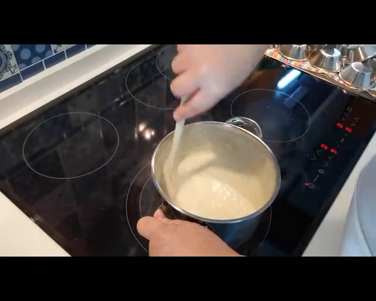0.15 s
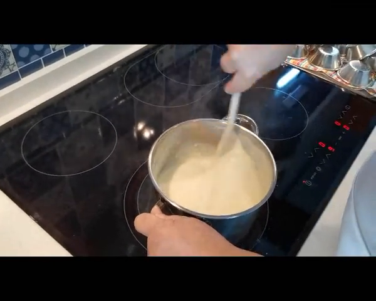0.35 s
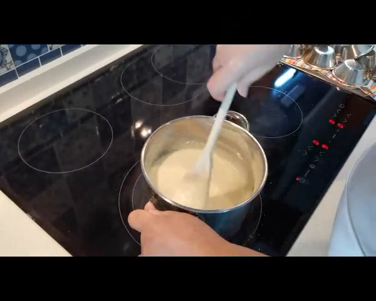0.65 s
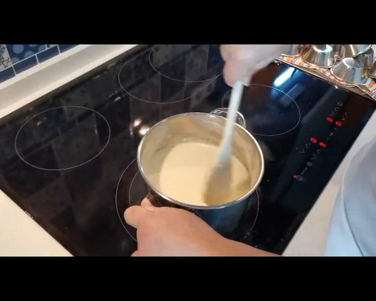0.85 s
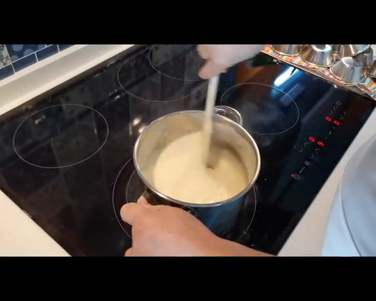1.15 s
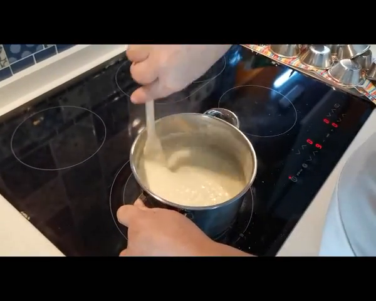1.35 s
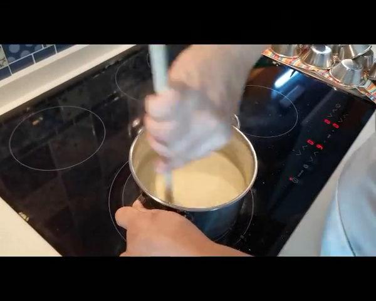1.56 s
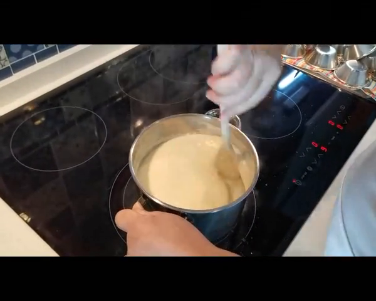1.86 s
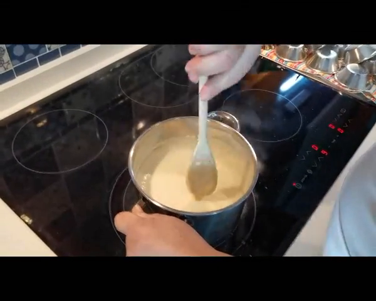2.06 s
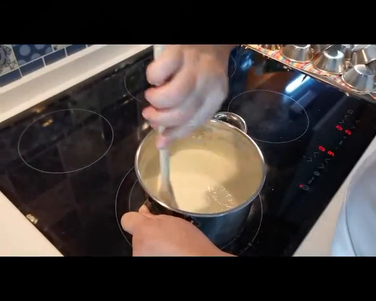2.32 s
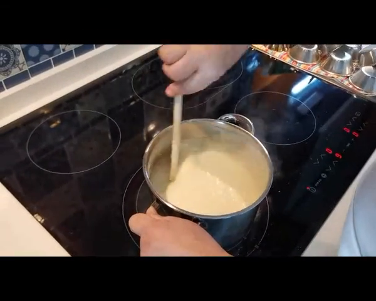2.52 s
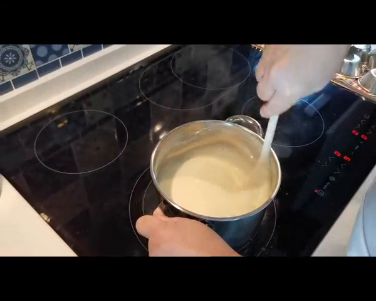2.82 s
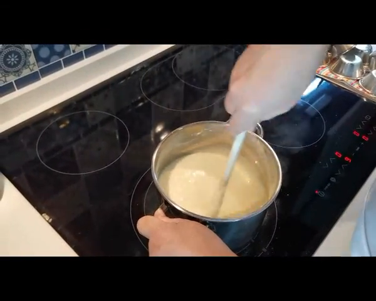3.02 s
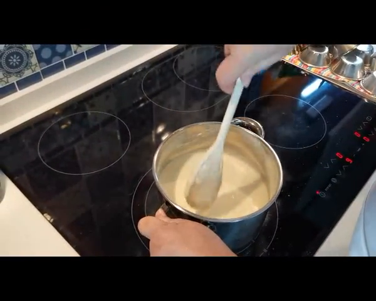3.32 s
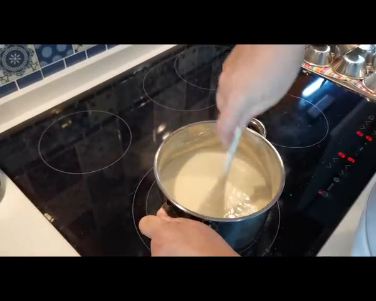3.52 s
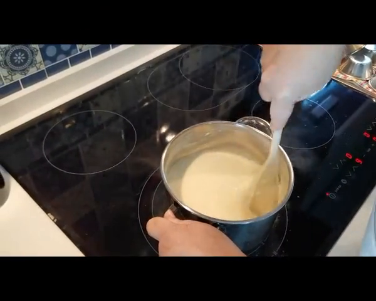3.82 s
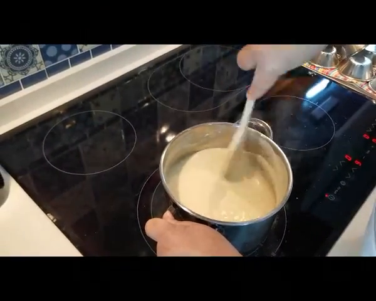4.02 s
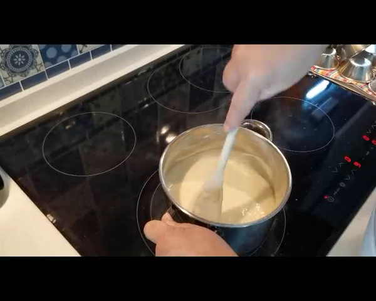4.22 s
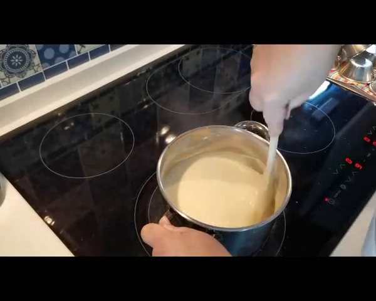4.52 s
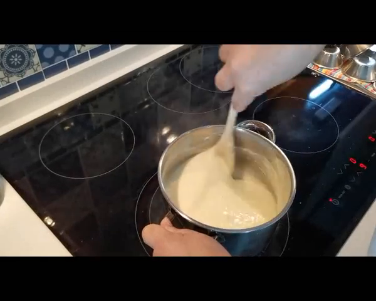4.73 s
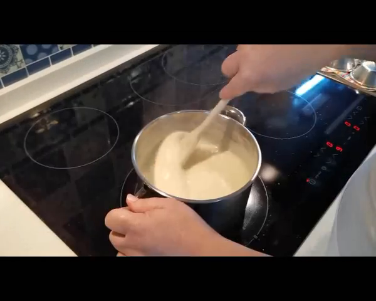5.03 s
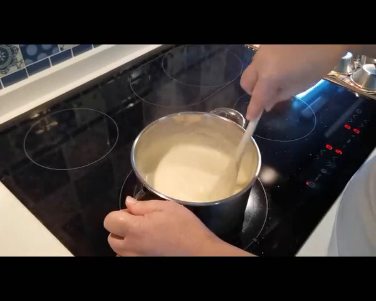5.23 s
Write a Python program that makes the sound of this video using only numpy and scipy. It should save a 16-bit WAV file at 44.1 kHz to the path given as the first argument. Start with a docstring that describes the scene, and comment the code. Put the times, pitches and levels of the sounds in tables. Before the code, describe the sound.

A wooden spoon scrapes and knocks around a steel saucepan, stirring a thick, softly churning filling in a quiet kitchen.

```python
"""Gritty scrapes and dull knocks: a wooden spoon stirs thick filling in a steel saucepan on a glass hob.
Stroke by stroke the wood slips over the steel, rasping, hissing and briefly squealing. Its knocks ring
the wall, damped by the filling, and the rocking pan thuds in the hob. The filling churns in soft waves
and ticks now and then over a small kitchen's hush. Near the end the sound cuts out for an instant."""
import sys
import numpy as np
from scipy import signal
from scipy.fft import rfft, irfft, next_fast_len
from scipy.io import wavfile
from scipy.ndimage import map_coordinates

SR = 44100
rng = np.random.default_rng(int(sys.argv[2]) if len(sys.argv) > 2 else 0)


def log_audio(samples):
    """Write samples as a 16-bit WAV file to the path given in sys.argv[1]."""
    # one column per channel
    frames = np.atleast_2d(samples).T
    # limit to full scale, then quantise
    limited = np.clip(frames, -1, 1)
    pcm = np.round(limited * 32767).astype(np.int16)
    wavfile.write(sys.argv[1], SR, pcm)


N = 237037

# spoon hits on the pan: (time [s], ring [dB], clack [dB], contact cut-off [Hz], treble lean left less 2 dB
# [dB], wall pitch [factor], ring length [factor], clack tilt [dB/octave]); the treble leans left by that value
# plus 2 dB
KNOCKS = [(0.0703, -37.5, -31, 2840, -4.5, 0.95, 0.5, 0), (0.332, -42, -30, 2840, -5.5, 0.86, 0.47, 2.5),
          (0.4158, -63, -41.5, 2290, -4.5, 1, 0.52, 2.5), (1.0069, -27, -33, 3000, -5, 1.0, 0.55, -1),
          (1.336, -77, -51, 1880, 1, 1.3, 0.66, -2.5), (2.2409, -43, -39.5, 1310, -1.5, 0.8, 0.33, 2),
          (2.627, -78, -41, 3720, 5, 1.03, 0.5, -0.1), (3.5641, -47.5, -41, 1060, 6, .92, 0.19, -6.5),
          (4.3115, -32, -30, 2540, 2, 0.92, 0.19, -2), (5.119, -59, -38.5, 3030, 2.5, 1.23, 0.32, -0.5),
          (5.2054, -75, -46, 2300, 2, 1.3, 0.41, -3)]
# modes of the glass hob: (frequency [Hz], level [dB], t60 [s])
HOB = [(65.8, 7, 0.31), (116.8, 3, 0.26), (183.7, -10.5, 0.16)]
SIMMER_DB = -72  # the filling's motion between waves


def scrape(grip=0.25, firm_db=-56, brighten=0.44, fast_db=-43):
    """Wood slips over steel: coarse slips rasp and ring the pan, fine ones hiss."""
    # pan resonances that friction excites: (frequency [Hz], width [Hz], level [dB])
    resonances = [(1485, 84, -0.5), (1670, 140, -1), (2115, 86, 2.5), (2683, 120, -5.5), (2870, 36, -8),
                  (4133, 160, -8), (4620, 470, -15)]
    # tone of the coarse, the fine and the sharpest slips: (frequency [Hz], level [dB])
    rasp_eq = [(200, -3.5), (600, -4.5), (950, 3), (1180, 0), (1600, 2), (2300, -0.5), (3100, -5.5),
               (4700, -13), (8000, -27)]
    hiss_eq = [(1200, -2), (3000, 0), (4900, 7), (5600, 3), (7200, 4.5), (8300, -1.5), (9600, 1),
               (11500, -7), (13700, -48), (16000, -21)]
    sizzle_eq = [(4000, -33), (7000, -1), (9500, -3), (11000, 0.5), (12800, 0), (13800, -14.5),
                 (16000, -32)]
    rasp_gain, hiss_gain = pressure()
    rasp_db, hiss_db = (10 * np.log10(np.mean(gain ** 2, axis=0)) for gain in (rasp_gain, hiss_gain))
    # the spoon's hold keeps changing, more so the harder it is pressed
    chatter = wobble(70) * np.clip(1 + 0.029 * (rasp_db - firm_db), 0.3, 1.5)
    steel = lambda f: sum(amp(db) * 1j * f * width / (hz ** 2 - f ** 2 + 1j * f * width)
                          for hz, width, db in resonances)
    ring = grit(steel, rate=700, size_db=4, smooth_db=-3)
    rub = grit(shaped(rasp_eq), rate=900, size_db=-1, smooth_db=6)
    # a firm stroke cuts through the film of filling and rings the steel more
    ring_share = 1 / (1.2 + np.exp(-grip * (rasp_db - firm_db)))
    rasp = np.sqrt(ring_share) * ring + np.sqrt(1 - ring_share) * rub
    fine = grit(shaped(hiss_eq), rate=2500, size_db=2, smooth_db=2.5)
    crisp = grit(shaped(sizzle_eq), rate=1300, size_db=6.5, smooth_db=0.5)
    # a fast stroke sheds sharper slips, so its hiss is brighter
    edge = amp(brighten * (hiss_db - fast_db))
    hiss = (fine + edge * crisp) / np.sqrt(1 + edge ** 2)
    rasp, hiss = patchy(rasp, depth_db=2), patchy(hiss, depth_db=2.3)
    return rasp_gain * amp(1.56 * chatter) * rasp + hiss_gain * amp(2.07 * chatter) * hiss


def pressure(swell_db=24, ease_db_per_s=13, release_s=0.046, glide_rasp_db=-71, glide_hiss_db=-76.5):
    """Stereo envelopes of rasp and hiss: strokes swell, ease while held and let go over a light glide."""
    # the spoon pressed along the steel: (peak time [s], hold [s], rise [s], rasp [dB], hiss [dB],
    # rasp lean left [dB], hiss lean left [dB])
    strokes = [(0.095, 0.025, 0.074, -57, -59.5, -1, 0), (0.37, 0.19, 0.2, -48.5, -51, -4.5, 1),
               (0.451, .02, .06, -64, -49.5, -2, 6), (0.617, 0.37, .1, -63.5, -67, -2.5, 2.5),
               (1.13, 0.11, 0.3, -61, -83, -2, 6), (1.266, 0.0073, .06, -55, -55, 0, 3),
               (1.42, .38, 0.34, -69, -72, 0, 3), (1.899, 0.031, .17, -54, -54, 1, 2),
               (1.962, .05, 0.11, -59, -75, 0, 2), (2.42, 0.16, 0.15, -65.5, -65.5, 3, -2),
               (2.637, 0.046, 0.073, -55.5, -56.5, 1, 4), (2.741, 0.092, 0.075, -52.5, -54.5, 4, 4),
               (2.863, 0.062, .1, -52, -58.5, 6, 4), (3.002, 0.045, 0.17, -63.5, -64.5, 12, 4),
               (3.16, 0.023, 0.24, -67, -69.5, 11, 2), (3.854, 0.1, 0.23, -57, -61.5, 5, -1),
               (3.944, 0.08, 0.1, -65.5, -60, 9, 5), (4.504, 0.073, .03, -67.5, -62, 6, 2),
               (4.663, 0.024, 0.083, -47, -52, 5, 5), (4.757, 0.045, 0.15, -46.5, -47.5, 6, 3),
               (4.873, 0.14, 0.16, -47.5, -55.5, 2, -2), (5.348, 0.014, 0.036, -64.5, -64, 5, 6)]
    t = np.arange(N) / SR
    glide = (flow() / amp(SIMMER_DB)) ** 0.19  # louder as the spoon pushes more filling
    rasp_power, hiss_power = (amp(glide_rasp_db) * glide) ** 2, (amp(glide_hiss_db) * glide) ** 2
    for s, hold, rise, rasp_db, hiss_db, rasp_lean, hiss_lean in strokes:
        away = np.maximum(s - t, 0) / rise + np.maximum(t - s - hold, 0) / release_s
        press = amp(-swell_db * np.minimum(away, 10) - ease_db_per_s * np.clip(t - s, 0, hold))
        rasp_power = rasp_power + panned(amp(rasp_db) * press, rasp_lean) ** 2
        hiss_power = hiss_power + panned(amp(hiss_db) * press, hiss_lean) ** 2
    return np.sqrt(rasp_power), np.sqrt(hiss_power)


def patchy(pair, depth_db):
    """The moving contact point favours ever different bands, a few hundred Hz by some 40 ms."""
    spectrum = signal.stft(pair, nperseg=512)[2]
    patch = np.outer(np.hanning(9), np.hanning(11))
    field = signal.fftconvolve(rng.standard_normal(spectrum.shape[1:]), patch, "same")
    return unit(signal.istft(spectrum * amp(depth_db * unit(field)), nperseg=512)[1][:, :N])


def knocks(snap_db=-44, waver=0.033, attack_s=0.00031, beam_hz=600):
    """Each hit clacks and rings the damped wall; a softer contact loses the treble."""
    # modes of the filled pan's wall: (frequency [Hz], level [dB], base t60 [s])
    wall = [(196.5, -15.5, 0.51), (308, -20, 0.25), (464, -32, 0.22), (532, -12.5, .17), (700, -30, 0.039),
            (857, -5.5, 0.092), (964, -1.5, 0.098), (1195, 5.5, 0.14), (1230, -29, 1), (1350, 2.5, 0.054),
            (1650, -26, 0.21), (2100, -28.5, 0.17), (2230, -14.5, 0.063), (2700, -35, 0.1),
            (3240, -8.5, 0.063)]
    # tone of wood striking steel: (frequency [Hz], level [dB])
    clack_eq = [(50, -36.5), (130, -15.5), (210, -3.5), (330, 0), (450, -1), (700, -1.5), (1100, -1.5),
                (1500, -1.5), (2100, -4), (3300, -8), (6000, -9.5), (14000, -1.5)]
    # decay of that contact: (frequency [Hz], t60 [s])
    clack_decay = [(200, 0.19), (1000, 0.058), (2500, 0.036), (5000, 0.03), (10000, 0.013)]
    out, t = np.zeros((2, N)), np.arange(SR // 3) / SR
    mode_hz, mode_db, t60 = np.transpose(wall)[:, :, None]
    onset = 1 - np.exp(-t / attack_s)  # a very short rise softens each knock's onset
    for s, ring_db, clack_db, cutoff_hz, lean_db, pitch, length, tilt_db in KNOCKS:
        # filling heaped against the wall shifts and damps its modes; its motion makes them waver
        drift = waver * np.sqrt(mode_hz / 1000) * rng.standard_normal((len(wall), len(t))).cumsum(axis=1)
        modes = amp(-60 * t / (length * t60)) * np.exp(1j * (2 * np.pi * pitch * mode_hz * t + drift))
        # left and right each get a mode at their own strength and phase
        strength = amp(mode_db.T + rng.standard_normal((2, len(wall))))
        phase = rng.uniform(0, 2 * np.pi, len(wall))
        phase = phase + 0.23 * mode_hz.T / 1000 * rng.standard_normal(strength.shape)
        ring = ((strength * np.exp(1j * phase)) @ modes).real
        contact = lambda hz: 1 / np.sqrt(1 + (hz / cutoff_hz) ** 7.2) + amp(snap_db)
        colour = lambda hz: amp(along(clack_eq, hz) + tilt_db * np.log2(1 + hz / 300)) * contact(hz)
        clack = causal(dying_noise(clack_decay)[:, :len(t)] * onset, colour)
        hit = amp(ring_db) * burst(causal(ring * onset, contact)) + amp(clack_db) * burst(clack)
        # short waves are beamed to one side, long ones spread evenly
        beam = lambda hz: panned(0.89, -0.5 + (lean_db + 2.5) * hz ** 2 / (hz ** 2 + beam_hz ** 2))
        add(out, s, in_kitchen(filtered(hit, beam), wet_db=-10))
    return out


def lead_ins(below_clack_db=24, swell_db=24, rise_s=0.019, top_hz=2200):
    """A faint, dull noise swells just before each knock."""
    out, t = np.zeros((2, N)), np.arange(SR // 25) / SR
    swell = amp(-swell_db * (t[-1] - t) / rise_s)
    for s, _, clack_db, *_ in KNOCKS:
        noise = unit(spread(rng.standard_normal((2, len(t))), lambda hz: 1 / (1 + (hz / top_hz) ** 2)))
        add(out, s - t[-1], amp(clack_db - below_clack_db) * swell * noise)
    return out


def thuds(attack_s=0.0012, detune=0.08):
    """The rocking pan thumps the hob's low modes; the hand's weight retunes them from hit to hit."""
    # the pan rocks: (time [s], level [dB], tilt towards the upper modes [dB/octave])
    rocks = [(0.072, -50.5, 14), (0.335, -33, 17.5), (0.418, -41, 15), (1.012, -50.5, 12),
             (1.336, -45.5, -3), (1.493, -46, -12), (1.529, -47.5, -37), (2.628, -40.5, -3.5),
             (3.566, -47.5, 18.5), (4.315, -43.5, 3), (4.57, -53, -25), (5.122, -44, 4), (5.206, -36, -4.5)]
    out, t = np.zeros((2, N)), np.arange(SR // 2) / SR
    onset = 1 - np.exp(-t / attack_s)
    for s, db, tilt_db in rocks:
        pitch = 1 + detune * (rng.random() - 0.5)
        ring = sum(amp(level + tilt_db * np.log2(hz / HOB[0][0]) - 60 * t / t60)
                   * np.sin(2 * np.pi * pitch * hz * t) for hz, level, t60 in HOB)
        add(out, s, panned(amp(db) * burst(ring * onset), lean_db=2.5))
    return out


def squeals():
    """Stick and slip lock briefly onto one resonance: a rough, narrow band swells and fades."""
    # the spoon grips: (peak time [s], fade in and out [s], centre [Hz], width [Hz], level [dB],
    # lean left [dB])
    grips = [(.47, 0.089, 2020, 220, -57.5, -10), (0.543, 0.058, 1335, 180, -54, -2),
             (0.801, 0.19, 4710, 1210, -66.5, -2), (1.268, .035, 5050, 1100, -57.5, 8),
             (2.653, 0.038, 4200, 1380, -52.5, -8), (2.79, 0.093, 8400, 3160, -50.5, 21),
             (2.922, 0.0402, 1370, 260, -49.5, 16), (3.002, 0.11, 1450, 200, -63.5, 17),
             (4.635, 0.066, 4450, 1300, -54.5, -4), (4.929, 0.09, 4670, 650, -51, -27),
             (5.013, 0.02, 1330, 506, -42, 3.5)]
    out = np.zeros((2, N))
    for s, fade_s, centre_hz, width_hz, db, lean_db in grips:
        swell = np.hanning(int(2 * fade_s * SR))
        noise = rng.standard_normal((2, SR // 2))[:, :len(swell)]
        band = spread(noise, lambda hz: 1 / (1 + (2 * (hz - centre_hz) / width_hz) ** 4))
        add(out, s - fade_s, panned(amp(db) * unit(band) * swell, lean_db))
    return out


def filling(squelch_db=-62.5, squelch_growth=1.7, crest_db=-54):
    """Thick filling folds round the spoon in soft, hollow lumps; a big wave also squelches."""
    # tone of the lumps and of the wet folds: (frequency [Hz], level [dB])
    churn_eq = [(60, -7), (170, -19), (240, 2), (310, 5), (400, -6), (490, 0.5), (680, -20.5), (950, -7.5),
                (1400, -28.5), (3000, -55.5)]
    squelch_eq = [(300, -18.5), (550, 3), (950, -2.5), (1400, -5), (2300, -4.5), (3200, -13), (7000, -26.5)]
    motion = flow()
    lumps = grit(shaped(churn_eq), rate=200, size_db=-1, smooth_db=7.5)
    folds = grit(shaped(squelch_eq), rate=260, size_db=-0.5, smooth_db=7)
    squelch = amp(squelch_db + 1.8 * wobble(18)) * (motion / amp(crest_db)) ** squelch_growth * folds
    churn = motion * amp(1.74 * wobble(25)) * lumps
    return panned(churn + squelch, lean_db=-2)


def flow(rise_s=0.18, fall_s=0.12):
    """Envelope of the filling's motion: each wave builds up and subsides."""
    # waves the spoon shoves round the pan: (crest time [s], level [dB])
    waves = [(0.72, -65), (1.28, -65.5), (1.94, -55), (2.68, -68.5), (3.752, -58), (4.68, -67), (5.25, -60)]
    t = np.arange(N) / SR
    power = sum(amp(db) ** 2 * np.exp(-((t - s) / np.where(t < s, rise_s, fall_s)) ** 2)
                for s, db in waves)
    return np.sqrt(amp(SIMMER_DB) ** 2 + power)


def ticks(top_hz=12500):
    """Sticky filling and the spoon's catching edge give tiny snaps, each in a broad band."""
    # snaps: (time [s], level [dB], centre [Hz], half-width [octaves], t60 [s], lean left [dB])
    snaps = [(1.536, -71.5, 6000, 1.5, 0.049, -2), (2.015, -61, 4240, 0.54, 0.0068, -5),
             (2.0904, -69, 3470, 0.88, 0.003, -4), (2.1662, -80, 4500, 2, 0.0034, 22),
             (2.176, -54, 1100, 2.6, 0.0089, -17), (2.211, -64, 3450, 1.1, 0.011, -9),
             (2.4539, -55.5, 3480, 0.45, 0.056, -1.5), (3.834, -45, 2800, 0.41, 0.0085, -2)]
    out, t = np.zeros((2, N)), np.arange(SR // 4) / SR
    for s, db, centre_hz, octaves, t60, lean_db in snaps:
        snap = rng.standard_normal((2, len(t))) * amp(-60 * t / t60)
        band = lambda hz: 1 / (1 + (np.log2((hz + 1) / centre_hz) / octaves) ** 2)
        snap = causal(snap, lambda hz: band(hz) / (1 + (hz / top_hz) ** 14))
        add(out, s, in_kitchen(panned(amp(db) * burst(snap), lean_db), wet_db=-21))
    return out


def rumble(db=-61, follows=0.83, firm_db=-50, width_hz=45):
    """A hard stroke drags the pan against the hob, whose low modes murmur."""
    rasp_gain, _ = pressure()
    push = np.sqrt(np.mean(rasp_gain ** 2, axis=0)) / amp(firm_db)
    glass = lambda f: sum(amp(level) / (1 + ((f - hz) / width_hz) ** 4) for hz, level, _ in HOB)
    return amp(db) * push ** follows * unit(spread(rng.standard_normal((2, N)), glass))


def in_kitchen(x, wet_db, predelay_s=0.006):
    """The sound plus the small kitchen's diffuse reverb."""
    # reverb decay: (frequency [Hz], t60 [s])
    room_decay = [(100, 0.68), (300, 0.49), (1200, 0.3), (4000, 0.23), (12000, 0.17)]
    tail = dying_noise(room_decay)
    tail = np.pad(tail / np.linalg.norm(tail[0]), ((0, 0), (int(predelay_s * SR), 0)))
    return x + amp(wet_db) * signal.fftconvolve(x, tail, axes=1)[:, :x.shape[1]]


def room_tone(db=-62.5, sway_db=1.2):
    """The kitchen's low hush, gently wavering."""
    # tone of the hush: (frequency [Hz], level [dB])
    hush_eq = [(25, 4), (70, 1.5), (140, -4), (270, -10), (520, -18), (700, -12), (920, -18), (1300, -28.5),
               (4000, -24.5), (7000, -69.5), (15500, -35.5)]
    return amp(db + sway_db * wobble(6)) * unit(spread(rng.standard_normal((2, N)), shaped(hush_eq)))


def grit(colour, rate, size_db, smooth_db):
    """Tiny slips of uneven size, rate a second, on a bed of slips too fine to tell apart."""
    slips = (rng.random((2, N)) < rate / SR) * np.sign(rng.random((2, N)) - 0.5)
    sizes = amp(size_db * np.minimum(rng.exponential(size=N), 4))
    bed = amp(smooth_db) * rng.standard_normal((2, N))
    return unit(spread(unit(slips * sizes) + bed, colour))


def dying_noise(decay):
    """Stereo noise in which each frequency dies at its own speed."""
    hz, t, spectrum = signal.stft(spread(rng.standard_normal((2, SR // 2))), SR, nperseg=128)
    fade = amp(-60 * t / along(decay, hz)[:, None])
    return signal.istft(spectrum * fade, SR, nperseg=128)[1][:, :SR // 2]


def spread(pair, colour=np.ones_like):
    """Two unrelated signals, coloured, become left and right: narrow in the bass, wide in the treble."""
    # stereo image: (frequency [Hz], left-right correlation [0-1])
    correlation = [(100, 0.47), (330, 0.74), (550, 0.45), (1000, 0.11), (2000, 0.087), (6000, 0.014)]

    def response(hz):
        alike = along(correlation, hz)
        return colour(hz) * np.sqrt(np.array([1 + alike, 1 - alike]) / 2)
    mid, side = filtered(pair, response)
    return np.array([mid + side, mid - side])


def panned(x, lean_db):
    """Constant-power pan; positive leans left."""
    gains = amp(np.array([lean_db, -lean_db]) / 2).reshape(2, -1)
    return x * gains / np.sqrt(np.mean(gains ** 2, axis=0))


def filtered(x, response):
    """EQ by a response of frequency."""
    n = x.shape[-1]
    size = next_fast_len(n + SR // 4)
    return irfft(rfft(x, size) * response(np.fft.rfftfreq(size, 1 / SR)), size)[..., :n]


def causal(x, gain, size=4096):
    """Minimum-phase EQ: nothing sounds ahead of a hit."""
    cepstrum = irfft(np.log(np.maximum(gain(np.fft.rfftfreq(size, 1 / SR)), 1e-6)))
    cepstrum[1:size // 2] *= 2
    cepstrum[size // 2 + 1:] = 0
    impulse = irfft(np.exp(rfft(cepstrum)))
    return signal.fftconvolve(x, impulse[None], axes=1)[:, :x.shape[1]]


def shaped(points):
    """(Hz, dB) points as a gain of frequency."""
    return lambda hz: amp(along(points, hz))


def along(points, hz):
    """(Hz, value) points read on a log axis."""
    knots_hz, values = np.transpose(points)
    return np.interp(np.log(hz + 1), np.log(knots_hz + 1), values)


def wobble(rate):
    """A smooth random curve, rate knots a second."""
    return map_coordinates(rng.standard_normal(int(N * rate / SR) + 4), [np.arange(N) * rate / SR])


def amp(db):
    """Decibels to gain."""
    return 10 ** (np.asarray(db) / 20)


def unit(x):
    """Scale to rms 1."""
    return x / np.sqrt(np.mean(x ** 2) + 1e-20)


def burst(x):
    """Scale a hit to the energy of 30 ms at rms 1."""
    return x / np.sqrt(np.mean(np.sum(x ** 2, axis=-1)) / (0.03 * SR))


def add(track, s, sound):
    """Mix a sound into the track at time s."""
    part = track[:, round(s * SR):][:, :sound.shape[1]]
    part += sound[:, :part.shape[1]]


def scene():
    """Hits and friction over the hob's murmur, the filling and the room."""
    hits = lead_ins() + knocks() + thuds() + ticks()
    friction = in_kitchen(scrape() + squeals(), wet_db=-12.5)
    return hits + friction + rumble() + filling() + room_tone()


def record(dry, low_cut_hz=50, top_hz=15780, gap_at_s=4.895, gap_s=0.062, gap_db=-43, edge_s=0.0059):
    """The deepest bass rolls off, the sound cuts out once for an instant, and the treble ends steeply."""
    heard = causal(dry, lambda hz: 1 / np.sqrt(1 + (low_cut_hz / (hz + 1)) ** 6), size=16384)
    since = np.arange(N) / SR - gap_at_s
    muted = np.clip(np.minimum(since, gap_s - since) / edge_s, 0, 1)
    return filtered(heard * amp(gap_db * muted), lambda hz: hz < top_hz)


dry = scene()
out = record(dry)
log_audio(out)
```